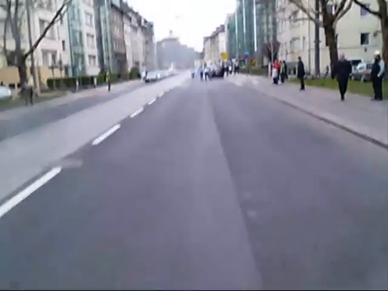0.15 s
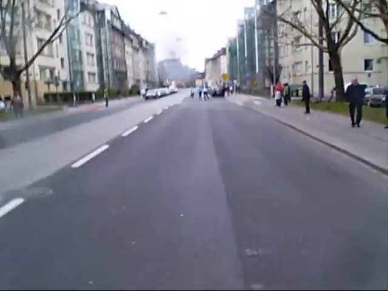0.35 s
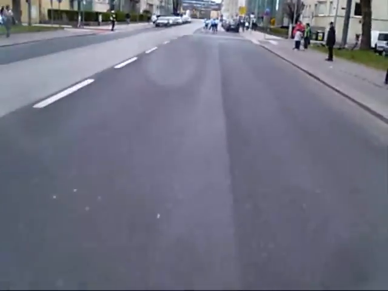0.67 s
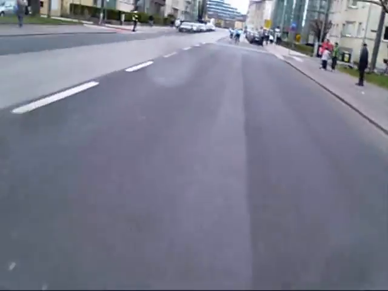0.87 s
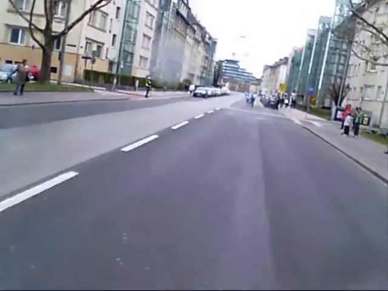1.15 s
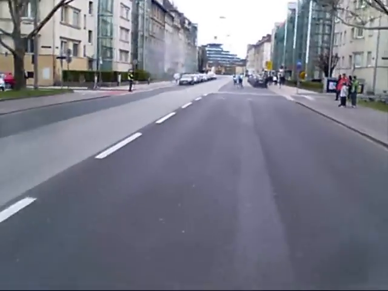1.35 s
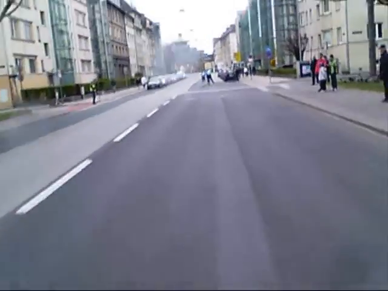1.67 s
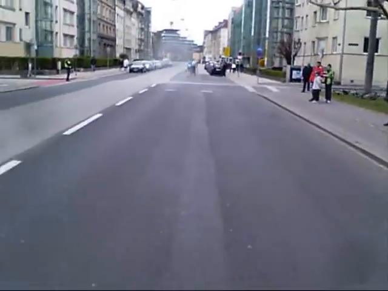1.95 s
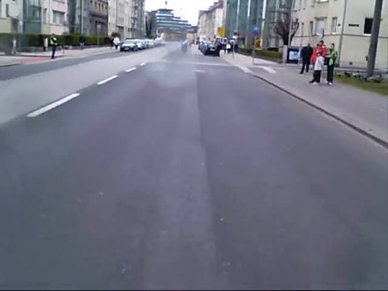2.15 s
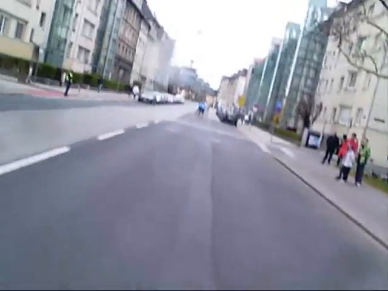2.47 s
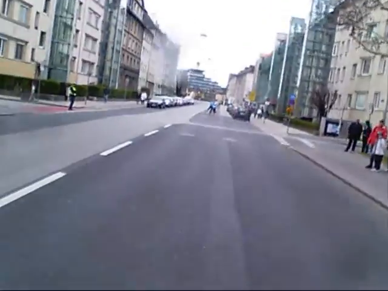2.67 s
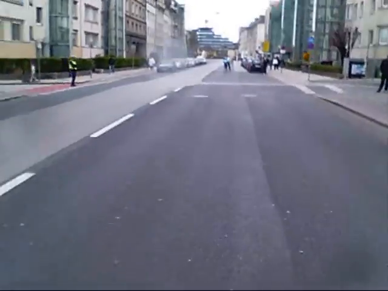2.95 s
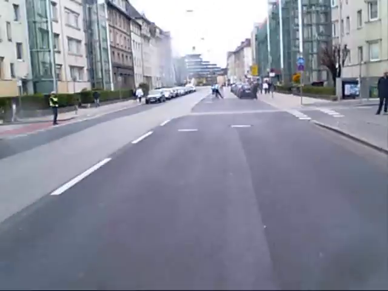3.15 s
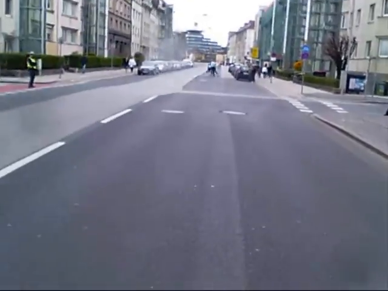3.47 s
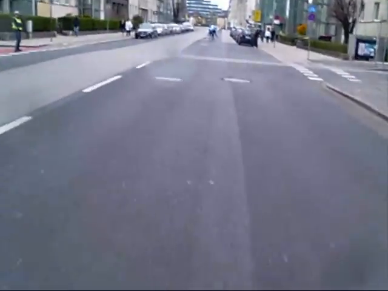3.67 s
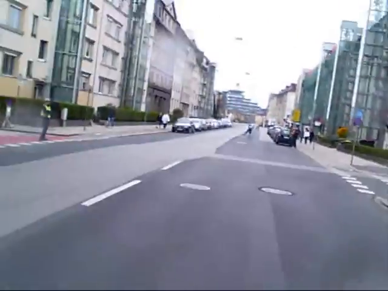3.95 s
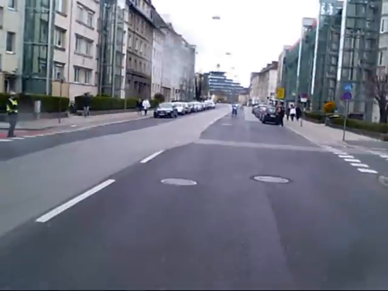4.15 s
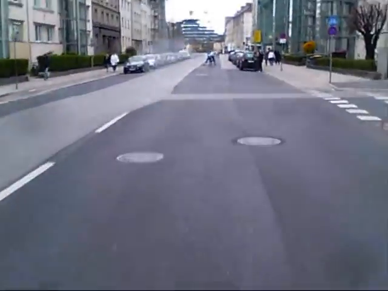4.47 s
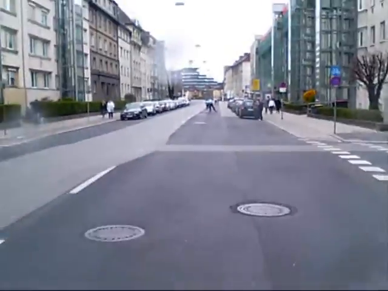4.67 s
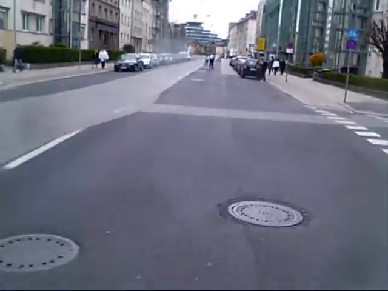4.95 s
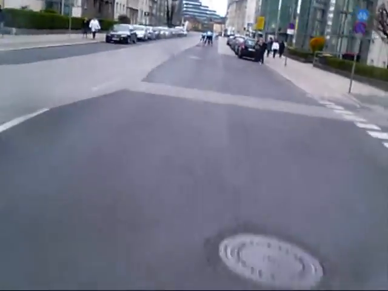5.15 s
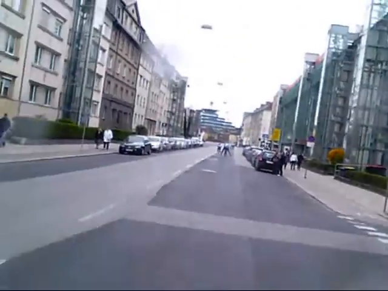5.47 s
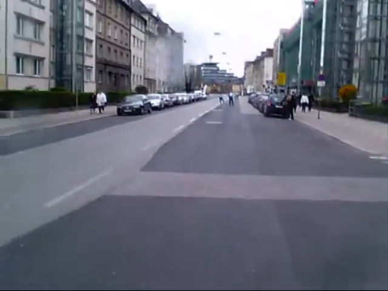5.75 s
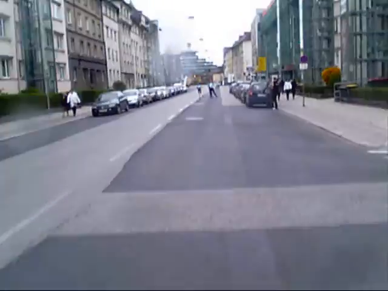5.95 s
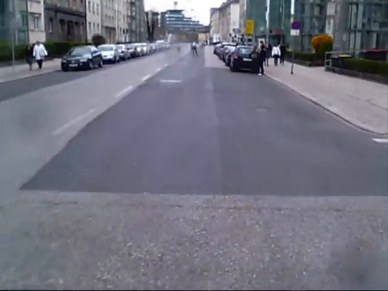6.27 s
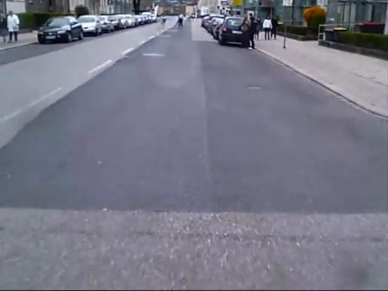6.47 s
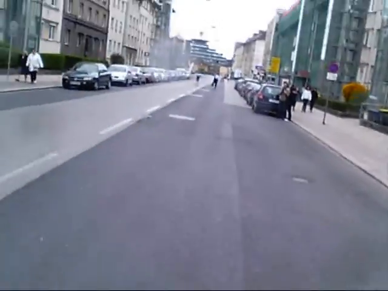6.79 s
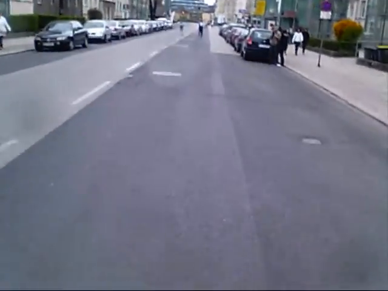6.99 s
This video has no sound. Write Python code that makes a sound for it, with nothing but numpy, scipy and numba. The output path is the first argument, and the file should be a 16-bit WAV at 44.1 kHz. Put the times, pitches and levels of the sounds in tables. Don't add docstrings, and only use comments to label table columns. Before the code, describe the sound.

A body-worn microphone in a small boxy case picks up skating along a wet road. Regular strides bring dull heaves, brief scuffs and airy spray, while wheels make a hollow, grainy mid-pitched rattle that swells and thins. Knocks and ticks strike the case early on and midway; the stony clatter is strongest near the end. Faint low wind, steady hiss, electronic buzz and high whine continue throughout.

```python
import sys
import numpy as np
from scipy import signal
from scipy.fft import rfft, irfft
from scipy.io import wavfile
from scipy.ndimage import uniform_filter1d
from numba import njit

SR = 44100
rng = np.random.default_rng(int(sys.argv[2]) if len(sys.argv) > 2 else 0)


def voltage_ratio(level):
    return 10 ** (np.asarray(level, float) / 20)


def transcribe(u):
    v = np.clip(np.atleast_2d(u).T, -1, 1)
    q = np.round(v * 32767).astype(np.int16)
    wavfile.write(sys.argv[1], SR, q)


N = 313945


def level(x, db):
    return x * voltage_ratio(db) / np.sqrt(np.mean(x ** 2))


@njit
def bandpass(x, hz, width):
    y, b, l = np.empty(len(x)), 0., 0.
    for i in range(len(x)):
        g = np.tan(np.pi * hz[i] / SR)
        k = width / hz[i]
        v = (b + g * (x[i] - l)) / (1 + g * (g + k))
        b, l, y[i] = 2 * v - b, l + 2 * g * v, k * v
    return y


def resonance(x, hz, width_hz):
    centre = hz * np.ones(N)
    once = bandpass(x, centre, float(width_hz))
    return bandpass(once, centre, float(width_hz))


def walk(rate_hz):
    k = int(SR / rate_hz)
    held = np.repeat(rng.standard_normal(N // k + 1), k)
    return 1.3 * uniform_filter1d(uniform_filter1d(held, k), k)[:N]


def coloured(spectrum):
    hz, db = np.transpose(spectrum)
    f = np.maximum(np.fft.rfftfreq(N, 1 / SR), 1)
    gain = voltage_ratio(np.interp(np.log(f), np.log(hz), db))
    return irfft(rfft(rng.standard_normal(N)) * gain, N)


def grit(per_s, spread_db):
    hit = rng.random(N) < per_s / SR
    strength = voltage_ratio(spread_db * np.minimum(rng.exponential(size=N), 4))
    return hit * rng.standard_normal(N) * strength


def add(out, s, burst):
    i = int(s * SR)
    out[i:i + len(burst)] += burst[:N - i]


def ring(hz, t60_s, rise_s):
    t = np.arange(int(t60_s * SR)) / SR
    decay = np.exp(-np.log(1000) * t / t60_s)
    return np.sin(2 * np.pi * hz * t) * decay * (1 - np.exp(-t / rise_s))


def swell(s, db, rise_s, fall_s):
    late = np.arange(N) / SR - s
    return voltage_ratio(db - 10 * np.maximum(-late / max(rise_s, .003), late / max(fall_s, .003)))


FRAME_HZ = 30
STORAGE_WRITES = [
    (.92, 3.27, 7),
    (25.47, 3.69, 5),
    (43.14, 3.44, 11),
    (82.29, 3.06, 6),
    (102.46, 3.27, 5),
    (120.45, 3.22, 7),
    (144.23, 3.06, 6),
    (164.47, 3.06, 4),
    (176.46, 3.36, 6),
    (195.78, 3.69, 5),
]


def supply():
    frames = np.arange(N) / SR * FRAME_HZ
    phase = (frames - .035) % 1
    drain = np.exp(-phase / 0.23)
    climb = np.clip((phase - .57) / 0.352, 0, 1)
    out = voltage_ratio(-45.5) * uniform_filter1d(drain + climb, size=60)
    after = np.arange(int(3 * SR / FRAME_HZ)) / SR * FRAME_HZ
    sag = np.minimum(after / 0.17, 1) * np.exp(-np.maximum(after - .19, 0) / 0.46)
    writes = np.concatenate([np.round(first + every * np.arange(count))
                             for first, every, count in STORAGE_WRITES])
    for frame, size in zip(writes, voltage_ratio(1.2 * rng.standard_normal(len(writes)))):
        add(out, (frame + .755) / FRAME_HZ, -voltage_ratio(-40.5) * size * sag)
    return out - out.mean()


CLOCK_BEAT_HZ = 100 / 3
CLOCK_HZ = [3932.83, 4800, 5000, 5600, 7400, 7865.66, 9600]
# level_db [dB rms], lower_sideband_db, upper_sideband_db [dB re tone]
CLOCK_DB = [(-85, -30, -30), (-91, -20, -20), (-95, -20, -20), (-83, -9, -6), (-82, -8, -11),
            (-93, -20, -20), (-94, -20, -20)]


def whines():
    t, out = np.arange(N) / SR, 0
    for hz, (db, low_db, high_db) in zip(CLOCK_HZ, CLOCK_DB):
        for step, step_db in ((0, 0), (-1, low_db), (1, high_db)):
            cycles = (hz + step * CLOCK_BEAT_HZ) * t + rng.random()
            out = out + np.sqrt(2) * voltage_ratio(db + step_db) * np.sin(2 * np.pi * cycles)
    return out


# pitch_hz [Hz], level_db [dB per Hz]
HISS_SPECTRUM = [(88, -16.5), (150, -3.5), (193, -8.5), (276, -3.5), (400, -12.5), (600, -12),
                 (1050, -11.5), (1400, -7.5), (1900, -10), (2760, -15.5), (3300, -15.5), (4500, -15.5),
                 (7200, -17), (11000, -17.5)]


def floor():
    hiss = coloured(HISS_SPECTRUM) * voltage_ratio(0.29 * walk(25))
    beat = 2 * np.pi * CLOCK_BEAT_HZ * np.arange(N) / SR
    chop = .24 * np.sin(beat) + .17 * np.sin(2 * beat)
    return level(hiss + chop * resonance(hiss, 6500, 12000), -62)


# pitch_hz [Hz], level_db [dB per Hz]
AIR_SPECTRUM = [(2, -18), (6, -8), (15, 8.5), (40, 0), (80, -2), (150, -30), (300, -68)]


def air():
    return level(coloured(AIR_SPECTRUM) * voltage_ratio(2.5 * walk(3.91)), -61.5)


# start_s [s], peak_db [dB]
STRIDES = [
    (.121, -45),
    (.881, -43.5),
    (1.601, -48.5),
    (2.321, -43.5),
    (3.121, -54),
    (3.741, -47),
    (4.501, -47),
    (5.221, -46),
    (5.901, -53),
    (6.621, -46),
]


def heave():
    out = np.zeros(N)
    for s, db in STRIDES:
        add(out, s, -voltage_ratio(db) * ring(hz=3.6, t60_s=1.3, rise_s=0.026))
    return out


# start_s [s], peak_db [dB], pitch_hz [Hz], t60_s [s]
KNOCKS = [(0.4599, -42.5, 244, 0.034), (0.46, -55, 370, 0.043), (0.472, -40, 49, 0.35),
          (0.94, -50.5, 64, 0.26), (2.421, -47, 62, 0.18), (3.199, -44, 42.59, 0.33),
          (3.226, -51, 320, 0.029), (3.247, -43.5, 54, 0.16), (3.362, -46, 60.5, 0.19),
          (3.478, -50, 980, 0.02), (3.8, -61, 1150, 0.019), (6.801, -50, 36, 0.26)]
# start_s [s], peak_db [dB], pitch_hz [Hz], t60_s [s]
TICKS = [
    (.4598, -46, 1450, .008),
    (.4603, -50, 2900, .005),
    (.535, -53, 3220, .012),
    (.7587, -51, 750, .015),
    (1.6222, -51, 1400, .015),
    (2.818, -50, 1370, .015),
    (3.7858, -49, 1480, .015),
    (3.787, -54, 3400, .02),
    (5.9723, -50, 1500, .015),
    (6.119, -48, 1380, .015),
]


def knocks():
    out = np.zeros(N)
    for s, db, hz, t60_s in KNOCKS + TICKS:
        add(out, s, voltage_ratio(db) * ring(hz, t60_s, rise_s=0.13 / hz))
    return out


# start_s [s], level_db [dB rms], pitch_hz [Hz], decay_s [s]
SET_DOWNS = [
    (0.239, -67, 1700, .04),
    (0.914, -67, 1690, 0.09),
    (1.62, -60, 1690, 0.093),
    (2.36, -63, 1940, 0.047),
    (3.099, -58, 1780, 0.034),
    (3.785, -61, 1870, 0.045),
    (4.55, -69, 1660, 0.056),
    (5.967, -56.5, 1830, 0.023),
    (6.706, -63, 1660, 0.069),
]


def scuffs():
    out = np.zeros(N)
    t = np.arange(int(.25 * SR)) / SR
    for s, db, hz, decay_s in SET_DOWNS:
        scrape = rng.standard_normal(len(t))
        for _ in range(2):
            scrape = bandpass(scrape, hz + 0 * t, 750.0)
        add(out, s, level(scrape, db) * np.exp(-t / decay_s))
    return out


# peak_s [s], grit_db [dB], rise_s, fall_s [s per 10 dB]
LOADS = [(.22, -67, .15, .4), (.96, -64.5, 0.3, .3), (1.15, -64, 0.12, 0.28), (1.4, -63, 0.14, 0),
         (1.64, -69.5, .02, 0.2), (1.84, -66, .08, 0.06), (2.0, -62, 0.08, .14), (2.4, -70.5, .2, 0.4),
         (2.7, -73.5, 0.3, 0.04), (3.29, -59, 0.15, 0.07), (3.4, -63.5, .06, 0.26), (3.8, -65.5, .015, 0.2),
         (3.96, -61, 0.02, -0.02), (4.09, -71, 0.1, -0.03), (4.22, -74, 0.16, -0.03),
         (4.6, -61.5, 0.18, 0.15), (4.72, -60, 0.03, 0.37), (5.399, -57, 0.03, 0.02),
         (5.53, -68, 0.07, 0.13), (5.98, -65.5, 0.03, 0.33), (6.13, -70, 0.14, 0.5),
         (6.42, -62, -0.33, 0.04), (6.77, -65, 0.08, -0.44), (6.88, -56, 0.12, 0.17),
         (7.02, -58, -0.52, -0.75)]


def load():
    return sum(swell(*row) for row in LOADS)


CASE_RING_HZ = 1317
PEBBLES_PER_S, PEBBLE_SPREAD_DB = 30, 5
# start_s [s], peak_db [dB], pitch_hz [Hz]
STONES = [(0.2414, -44, 1470), (0.3147, -48, 1470), (0.7585, -45, 1270), (0.9882, -53, 1310),
          (1.0801, -41.5, 1380), (1.1268, -47, 1210), (1.2, -43, 1350), (1.2858, -41, 1350),
          (1.3154, -48, 1320), (1.3764, -53, 1360), (1.8135, -42, 1350), (1.926, -41, 1370),
          (1.9917, -39, 1390), (2.0235, -44, 1260), (2.061, -47, 1350), (2.1251, -43.5, 1350),
          (2.5336, -49, 1330), (3.9449, -49, 1310), (3.9756, -43, 1230), (4.2113, -46.5, 1390),
          (4.6556, -42, 1380), (4.6995, -45, 1400), (4.9303, -44.5, 1320), (6.0945, -55, 1530),
          (6.7775, -42, 1290), (6.8213, -38.5, 1260), (6.8363, -37, 1400), (6.8628, -38, 1340),
          (6.8737, -36.5, 1410), (6.9136, -49, 1340)]


def stones():
    out, press = np.zeros(N), load()
    t = np.arange(int(.02 * SR)) / SR
    shape = (t / 0.0017 * np.exp(1 - t / 0.0013)) ** 2
    thud = voltage_ratio(-19) * np.sin(2 * np.pi * 800 * t)

    def blow(hz):
        return shape * (np.sin(2 * np.pi * hz * t) + thud)

    for s, db, hz in STONES:
        add(out, s, voltage_ratio(db + 2.5) * blow(hz))
    for when, size, pitch in rng.random((int(PEBBLES_PER_S * N / SR), 3)):
        gain = press[int(when * N)] * voltage_ratio(PEBBLE_SPREAD_DB * size)
        add(out, when * N / SR, gain * blow(CASE_RING_HZ * (0.89 + .25 * pitch)))
    return out


# start_s [s], length_s [s], grit_db [dB], thud_db [dB]
RATTLES = [(0.757, .03, -76, -63.5), (1.201, 0.019, -58, -68), (1.251, 0.011, -56.5, -59.5),
           (1.3, 0.03, -55, -63.5), (1.353, 0.024, -55, -65), (1.39, 0.013, -56.5, -70),
           (1.81, 0.19, -66, -71), (1.885, .02, -68, -68), (2.053, 0.012, -60, -74),
           (2.813, 0.02, -62.5, -79), (3.466, 0.026, -68, -67), (3.979, 0.022, -57, -65),
           (4.056, 0.02, -64, -62.5), (4.557, .03, -65, -89), (5.345, 0.12, -61, -64.5),
           (5.322, 0.018, -58.5, -69), (5.411, 0.0099, -55, -68), (0.917, 0.11, -66, -89),
           (6.55, 0.023, -62, -67), (6.798, 0.086, -60, -64.5), (6.733, 0.061, -61, -69),
           (6.907, .025, -57, -66), (7.073, 0.0091, -66, -68)]


def rattles():
    t, edge_s = np.arange(N) / SR, .002
    on = [np.clip(np.minimum(t - s, s + long - t) / edge_s + 1, 0, 1) for s, long, *_ in RATTLES]
    return voltage_ratio(np.array(RATTLES)[:, 2:].T) @ on


# peak_s [s], spray_db [dB], bearing_db [dB], length_s [s per 10 dB]
PUSHES = [
    (.4, -72, -77.5, 0.45),
    (.93, -64, -75.5, 0.27),
    (1.747, -67.5, -72.5, 0.33),
    (2.394, -67, -73.5, 0.31),
    (3.307, -68, -73, 0.44),
    (3.86, -67.5, -76.5, 0.24),
    (4.605, -66.5, -72, 0.24),
    (5.304, -68, -77.5, 0.5),
    (6.064, -68.5, -74, 0.19),
    (6.738, -66, -74.5, 0.34),
]


def push_gain(column):
    return sum(swell(row[0], row[column], 0.46 * row[3], row[3]) for row in PUSHES)


def wheels():
    t, grit_gain = np.arange(N) / SR, load()
    lift = sum(np.exp(-abs(t - s) / np.where(t < s, .05, 0.096)) for s, *_ in SET_DOWNS)
    ring_hz = CASE_RING_HZ + 170 * lift
    chatter_gain, thud_gain = rattles()
    dull_gain = voltage_ratio(-81) + voltage_ratio(-65.5) * grit_gain / voltage_ratio(-59.5) + thud_gain
    spray_gain = voltage_ratio(-81.5) + push_gain(column=1)
    bearing_gain = voltage_ratio(-83.5) + push_gain(column=2)

    road = grit(per_s=2500., spread_db=1.4) * voltage_ratio(1.8 * walk(110))
    road = road / np.sqrt(uniform_filter1d(road ** 2, size=1100) + 1e-9)
    road = signal.sosfilt(signal.butter(4, 2300, fs=SR, output="sos"), road)
    wide = level(resonance(road, 1904, 1300), 0)
    hollow = level(resonance(road, ring_hz, 485), 0) + voltage_ratio(-12.5) * wide

    tread = level(road, -3) + level(rng.standard_normal(N), 3)
    chatter = level(resonance(tread, ring_hz, 400), 0) + voltage_ratio(-18) * wide
    dull = level(resonance(tread, 920, 910), 0) + level(resonance(tread, 500, 490), -11.5)

    droplets = rng.standard_normal(N) * voltage_ratio(1.25 * walk(25))
    spray = level(resonance(droplets, 6980, 4500), 0)
    rolling = rng.standard_normal(N) * voltage_ratio(1.54 * walk(35))
    bearing = level(resonance(rolling, 3307, 590), 0)

    out = (grit_gain + voltage_ratio(-76.0)) * hollow + chatter_gain * chatter + dull_gain * dull
    return out + spray_gain * spray + bearing_gain * bearing


def scene():
    body = air() + heave() + knocks()
    return (wheels() + stones() + scuffs() + body + floor())[None]


def band_limit(x):
    return signal.sosfilt(signal.butter(12, 11160, fs=SR, output="sos"), x)


def record(dry):
    top = signal.butter(12, 10634, fs=SR, output="sos")
    limited = signal.sosfiltfilt(top, dry + whines())
    return band_limit(limited + supply() + .0133)


dry = scene()
out = record(dry)
transcribe(out)
```